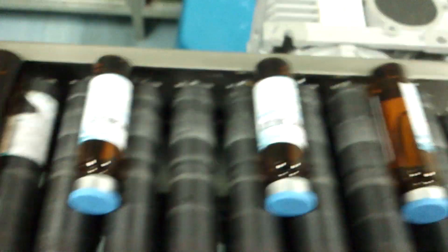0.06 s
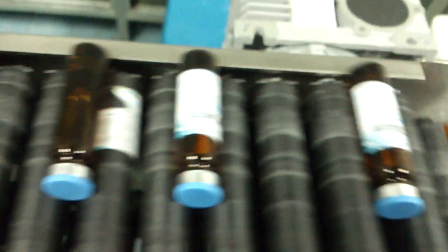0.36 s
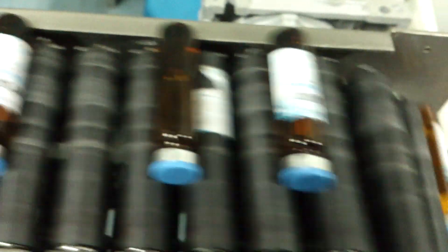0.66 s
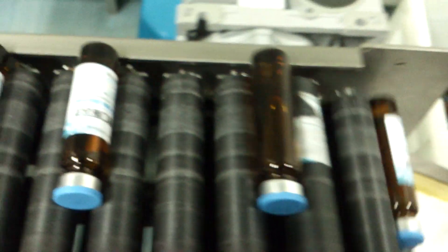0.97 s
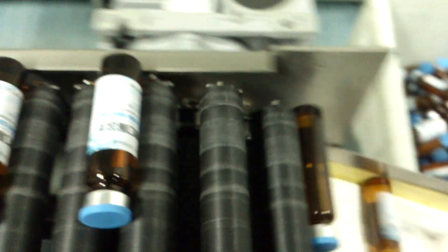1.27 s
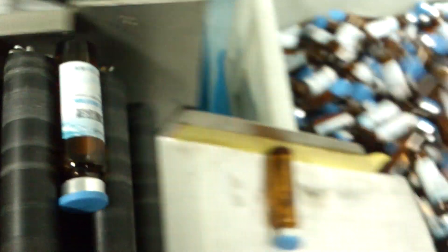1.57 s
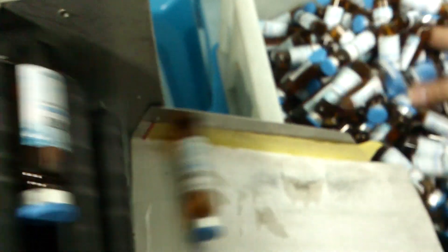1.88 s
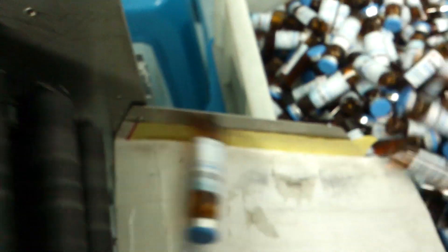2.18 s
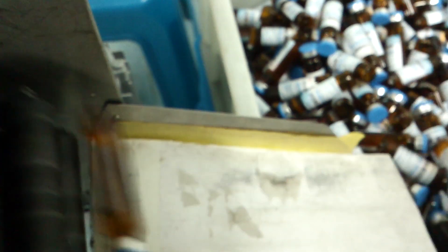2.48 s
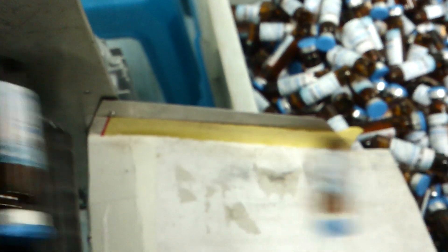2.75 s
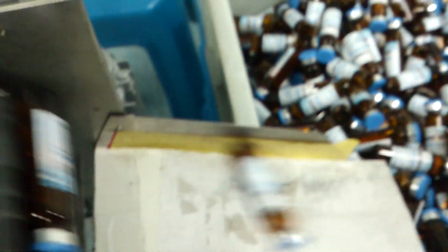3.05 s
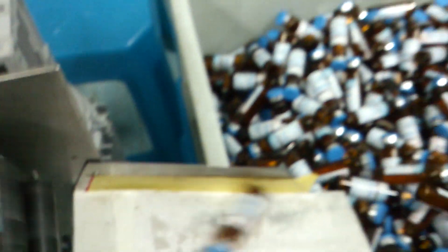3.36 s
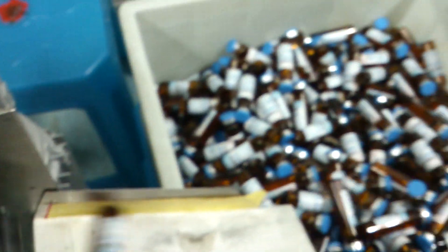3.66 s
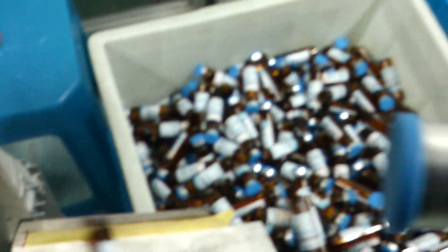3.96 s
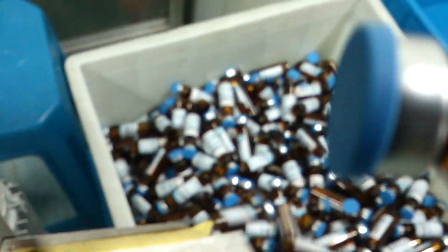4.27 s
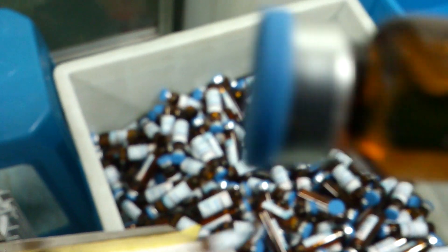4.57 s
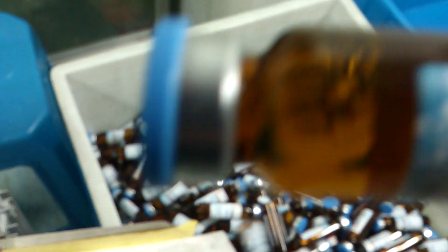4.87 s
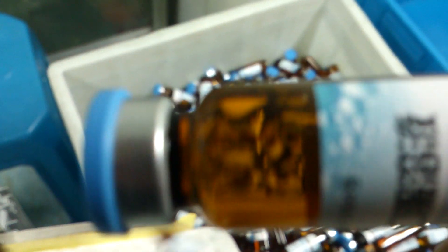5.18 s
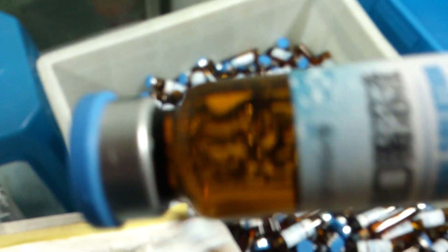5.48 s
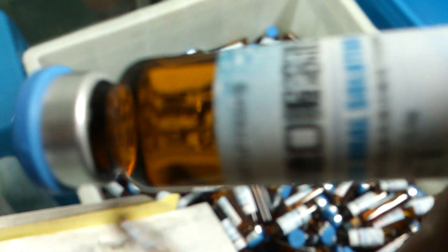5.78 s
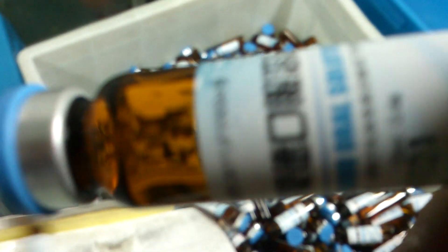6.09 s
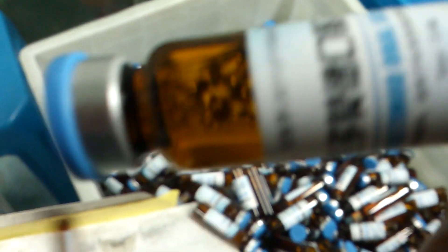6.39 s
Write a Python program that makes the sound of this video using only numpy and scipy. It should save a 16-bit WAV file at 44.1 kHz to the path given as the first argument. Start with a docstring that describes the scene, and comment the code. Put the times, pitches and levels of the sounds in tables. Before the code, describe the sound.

Little glass bottles rattle and collide on the rollers of a labeling machine, heard up close. Two rushes of air fill the first second; then come the busiest clinks, a brief roll down a chute and softer patters onto a pile of glass. Uneven knocks, faint whining drives and a swelling factory wash continue throughout. Toward the end the glass is quieter and a hand bumps the microphone softly.

```python
"""A factory hall, close by the roller conveyor of a labeling machine, one hand-held microphone.
Small glass vials chatter on the rumbling rollers, clink together, tumble down a chute and patter
into a crate. The mechanism knocks on its frame; in the first second a loud hiss of air surges twice.
Behind it all are the whine of the drives and the swelling wash of the hall. The microphone moves
off over the crate, and near the end the hand shifts on it with a low rumble."""
import sys
import numpy as np
from scipy import signal
from scipy.fft import rfft, irfft
from scipy.io import wavfile
from scipy.ndimage import uniform_filter1d

SR = 44100
rng = np.random.default_rng(int(sys.argv[2]) if len(sys.argv) > 2 else 0)


def dump(signal):
    """Clip the signal to [-1, 1] and save it as 16-bit WAV at the path in sys.argv[1]."""
    limited = np.clip(np.atleast_2d(signal).T, -1, 1)
    pcm = np.round(limited * 32767).astype(np.int16)
    wavfile.write(sys.argv[1], SR, pcm)


N = 284004
TIME = np.arange(N) / SR

# modes of a glass vial: nominal f/Hz, relative level/dB, t60/s
GLASS_MODES = [(6173, 0.5, 0.028), (6760, -8, 0.022), (12367, 1.5, 0.014), (12460, 2, 0.023),
               (15900, -6, .012)]
# spectrum of hissing air: f/Hz, relative level/dB
HISS_SPECTRUM = [(300, -67), (1800, -15.5), (2750, -4), (3300, -3), (3750, 1.5), (4900, -8.5), (6000, -15),
                 (7500, -16.5), (9500, -20.5), (11700, -16.5), (13100, -6.5), (14300, -15), (16000, -22)]


def chatter(per_s, scatter_db, level_db, bunch_db, count=8, size=3000):
    """Close up, slightly different vials tap in random bunches as the rollers turn them."""
    out = 0
    for _ in range(count):
        gaps, force = rng.exponential(size=(size, 2)).T
        at = (np.cumsum(gaps) * SR * count / per_s).astype(int)
        push = undb(scatter_db * np.minimum(force, 2.5)) * rng.choice([-1, 1], size)
        taps = np.bincount(at[at < N], push[at < N], N)
        body = vial(1 + 0.0011 * rng.standard_normal(), clack_db=-3.0, crack_db=-11.5, spread=.016)
        out = out + signal.oaconvolve(taps, body)[:N]
    bunched = unit(out * undb(bunch_db * wander(55)))
    return bunched * activity(bed_db=-35.5, near_power=1.4, column=2) * undb(level_db)


def clinks(level_db, clack_db, rebound_s, weight):
    """The harder collisions of glass on glass; no two vials ring quite alike."""
    # collisions: t/s, relative peak level/dB, clack against the ring/dB
    collisions = [(0.021, -17.5, -3), (0.063, -17, 1), (0.9116, -3, 0.5), (0.9927, -13, -13),
                  (1.0026, -6.5, -1.5), (1.0453, -12, 2), (1.06, -6.5, -15), (1.071, -15, -18),
                  (1.0904, -10, -21), (1.17, -9, -12), (1.2106, -12, -1.5), (1.3818, -12.5, -9),
                  (1.5474, -17, -18), (1.578, -18.5, -7), (1.8057, -9.5, -1), (1.9016, -13, -4.5),
                  (2.1103, -11, 2), (2.2426, -17, -11), (2.2563, -7, -4), (2.3908, -11, -4),
                  (2.4875, -11.5, -6), (2.5316, -17, -11), (2.7851, -16, -9), (2.8301, -14.5, -7),
                  (2.9731, -12, -17), (3.001, -11.5, -7.5), (3.3252, -10, -3.5), (3.3577, -16.5, -9),
                  (3.6177, -22, -2), (4.0295, -18.5, -11), (4.2652, -18, -12), (4.6557, -21, -18),
                  (4.915, -16.5, -6), (6.356, -16, -3)]
    out = np.zeros(N)
    for s, db, low_db in collisions:
        body = vial(1 + 0.0032 * rng.standard_normal(), low_db + clack_db, crack_db=-8.5, spread=0.043)
        # a light, bright touch is over sooner than a heavy clack
        push = contact(rebound_s * undb(weight * low_db), scatter=0.92)
        add(out, s, signal.fftconvolve(body, push), db + level_db)
    return out


def vial(tune, clack_db, crack_db, spread):
    """One vial's answer to a tap: glass ring, lower clack and a broadband crack."""
    # vial against its cap and the roller: nominal f/Hz, relative level/dB, t60/s
    clack_modes = [(3380, -20, 0.013), (3773, 14, 0.013), (4405, 9, 0.032)]
    sound = ring(GLASS_MODES, tune, spread, count=5)
    sound += undb(clack_db) * ring(clack_modes, tune, spread=0.0944, count=10)
    sound[0] += undb(crack_db)
    return sound


def crate(level_db, upper_db):
    """Vials patter on the pile; softer contact rings mostly the lowest glass mode."""
    # vials settling: t/s, relative peak level/dB, patter t60/s
    landings = [(.02, -30.5, 0.41), (3.21, -35, 0.22), (4.58, -36, .3), (4.759, -34, 0.45),
                (4.84, -34, 0.19), (4.919, -30.5, 0.37), (5.12, -36, .3), (5.519, -28, 0.11),
                (5.575, -19, 0.023), (5.66, -41, 0.21), (6.04, -41, 0.21), (6.391, -35, 0.37)]
    out = np.zeros(N)
    for s, db, patter_s in landings:
        body = ring(GLASS_MODES[:1], 0.99, spread=0.023, count=8)
        body += undb(upper_db) * ring(GLASS_MODES[1:], 0.99, spread=0.018)
        add(out, s, signal.fftconvolve(body, contact(patter_s, scatter=8.8)), db + level_db)
    return out


def air(hiss_db, roar_db, lead_s, spit_db, spit_s):
    """A rush of air surges twice, with more roar the second time."""
    # course of the rush: t/s, relative hiss level/dB, relative roar level/dB
    surges = [(.2, -41, -37), (0.251, -15, -26.5), (.31, -14, -27), (.36, -16, -29.5), (.49, -23, -35),
              (.55, -17, -26.5), (.68, -18.5, -25.5), (.76, -14.5, -22), (.82, -17, -24), (.88, -20, -28.5),
              (1.0, -21.5, -31)]
    # roar under the hiss: f/Hz, relative level/dB
    roar_spectrum = [(30, -37), (85, -21), (170, -12), (270, -11), (410, 4.5), (540, -1.5), (1000, -4),
                     (1400, -0.5), (2000, 0), (3500, -29)]
    start, end = surges[0][0], surges[-1][0]
    valve = np.clip((TIME - start) / 0.018, 0, 1) * np.clip((end - TIME) / 0.049, 0, 1)
    jet = noise(HISS_SPECTRUM, ripple_db=2.5) * undb(hiss_db + 0.66 * wander(60.8))
    treble = signal.sosfiltfilt(signal.butter(2, 5500, "high", fs=SR, output="sos"), jet)
    flow = follow(surges)
    # the treble spits as the valve opens and runs ahead of each surge
    spit = undb(spit_db * np.exp(-np.maximum(TIME - start, 0) / spit_s))
    hiss = (jet - treble) * flow + treble * spit * np.interp(TIME + lead_s, TIME, flow)
    roar = noise(roar_spectrum, ripple_db=3.5) * follow(surges, column=2) * undb(roar_db)
    return valve * (hiss + roar)


def knocks(level_db, crack_db, soft_hz):
    """Dry blows on the machine frame, whose modes lie densely; blunt contact leaves little treble."""
    # the mechanism's limping pairs of blows: t/s, relative peak level/dB
    blows = [(0.154, -22), (1.227, -18.5), (1.491, -21), (1.725, -15.5), (1.832, -16.5), (1.851, -15),
             (2.161, -18.5), (2.39, -17.5), (2.569, -17.5), (2.959, -20.5), (3.231, -17.5), (3.654, -19),
             (3.916, -16), (4.31, -21.5), (4.588, -21), (4.983, -18.5), (5.262, -18), (5.65, -24),
             (6.072, -19.5), (6.317, -26)]
    # machine frame: nominal f/Hz, relative level/dB, t60/s
    frame_modes = [(820, -16, 0.0034), (1280, 1, 0.011), (1690, 3, 0.016), (2290, -2.5, 0.022),
                   (3460, 7, 0.0036)]
    out = np.zeros(N)
    for s, db in blows:
        body = ring(frame_modes, 0.97, spread=0.192, count=20)
        body[0] += undb(crack_db)
        add(out, s, signal.fftconvolve(body, contact(t60=0.048, scatter=1.0)), db + level_db)
    return filtered(out, 1, soft_hz, "low")


def rollers():
    """The rollers rumble unevenly, answering each tumble late and dying away slowly."""
    # roller rumble: f/Hz, relative level/dB
    spectrum = [(30, -32), (90, -20.5), (150, -8.5), (215, -1.5), (280, 2.5), (350, -7.5), (500, -7.5),
                (1200, -36.5)]
    load = activity(bed_db=-42.5, near_power=0.85, column=4, lag_s=0.025, release_s=0.094)
    return noise(spectrum, ripple_db=-0.5) * load * undb(1.7 * wander(35))


def chute(level_db, pass_s, width_s):
    """Vials roll down the chute, loudest as the microphone passes over it."""
    # rolling on the chute: f/Hz, relative level/dB
    spectrum = [(70, -23), (200, 0), (450, 3.5), (750, 11), (1050, -7), (1700, -6), (3500, -16)]
    passing = np.maximum(1 / np.hypot(1, (TIME - pass_s) / width_s), undb(-26))
    return noise(spectrum, ripple_db=3) * passing * undb(level_db + 3.8 * np.tanh(wander(45)))


def drives(level_db):
    """The drives whine in faint, slightly wavering tones."""
    # drive tones: f/Hz, relative level/dB
    tones = [(283, -57.5), (1307, -69), (1401, -57), (1688, -55), (2755, -78)]
    whine = 0
    for hz, db in tones:
        pitch = hz * (1 + 0.00271 * wander(25))
        whine = whine + undb(db) * np.sin(2 * np.pi * np.cumsum(pitch) / SR)
    return np.sqrt(2) * undb(level_db) * whine


def buffet():
    """The second surge of air buffets the microphone."""
    # gust: t/s, level/dB
    gust = [(.45, -80), (.55, -46), (.75, -53), (.9, -83)]
    return rumble(gust, band_hz=[75, 135])


def handling():
    """The hand shifts on the microphone body with a deep rumble."""
    # handling noise: t/s, level/dB
    grip = [(5.55, -81), (5.68, -45), (5.78, -60.5), (5.98, -56), (6.15, -90)]
    return rumble(grip, band_hz=[35, 70])


def hall(swell_db, steady_db, sizzle_db, sizzle_growth):
    """Machinery farther off: a steady bed, and a wash that swells and hisses as each vial slides."""
    # wash of the hall: f/Hz, relative level/dB
    spectrum = [(25, -17), (90, -14), (160, -10), (280, -13), (600, -9.5), (1000, -8.5), (1500, -6),
                (2400, -4.5), (3700, 2.5), (4400, -3), (5400, -11.5), (6300, -10.5), (8000, -28),
                (15500, -36)]
    swell = activity(bed_db=-29.5, near_power=0.43, column=3)
    wash = noise(spectrum, ripple_db=1.5) * swell * undb(swell_db + 1.68 * wander(40))
    wash = filtered(wash, 1, 700, "high")
    sizzle = noise(HISS_SPECTRUM, ripple_db=2.5) * (swell / swell.max()) ** sizzle_growth
    return wash + undb(sizzle_db) * sizzle + undb(steady_db) * noise(spectrum, ripple_db=4.0)


def room(x, t60, wet_db, size=22050):
    """Direct sound plus diffuse reflections from the machine's panels and the hall."""
    tail = rng.standard_normal(size) * undb(-60 * np.arange(size) / SR / t60)
    return x + undb(wet_db) * signal.fftconvolve(x, tail / np.linalg.norm(tail))[:N]


def activity(bed_db, near_power, column, lag_s=0, attack_s=0.036, release_s=0.036):
    """Gain over time: a bed that grows with nearness, plus a rise, hold and fall for every tumble."""
    # microphone's nearness to the conveyor, then off over the crate: t/s, relative level/dB
    nearness = [(0, -8), (.45, -9), (1.05, 1.5), (1.28, -4.5), (1.8, 0.5), (2.35, -1.5), (2.7, -3.5),
                (3.1, -12), (4.5, -8.5), (6.44, -13)]
    # vials tumble off the rollers and slide: t/s, length/s, relative chatter/dB, scrape/dB, rumble/dB
    tumbles = [(0.01, 0.059, -40, -27.5, -61), (0.138, 0.055, -35.5, -25, -59),
               (0.98, 0.12, -27, -30, -39.5), (1.152, 0.057, -27.5, -30.5, -40),
               (1.549, 0.19, -27.5, -30.5, -38), (2.025, 0.32, -32, -36, -43), (2.774, .18, -38, -35, -43),
               (3.194, 0.035, -40.5, -32, -47), (3.327, 0.067, -41, -36, -46),
               (3.455, 0.032, -37, -23.5, -53), (3.574, 0.091, -46, -42, -44.5),
               (3.714, 0.036, -44, -34.5, -50.5), (3.976, 0.075, -34.5, -32.5, -42),
               (4.197, 0.04, -44, -32, -42.5), (4.36, 0.054, -62, -43, -48), (4.61, .07, -44, -37.5, -46),
               (4.765, 0.016, -38.5, -29, -62), (4.878, 0.056, -36, -28, -46.5),
               (5.14, 0.063, -47, -32.5, -58), (5.28, 0.057, -57, -44, -48.5),
               (5.485, 0.084, -42, -28, -53), (5.643, 0.07, -40.5, -28.5, -44),
               (5.886, 0.037, -44, -27.5, -46), (6.03, 0.13, -49, -35.5, -49.5),
               (6.216, 0.021, -46, -32.5, -55), (6.412, .04, -47, -30.5, -45)]
    power = (undb(bed_db) * follow(nearness) ** near_power) ** 2
    for row in tumbles:
        age = TIME - row[0] - lag_s
        fade = np.maximum(-age, 0) / attack_s + np.maximum(age - row[1], 0) / release_s
        power = power + (undb(row[column]) * np.exp(-fade)) ** 2
    return np.sqrt(power)


def ring(modes, tune, spread, count=4, size=1024):
    """Ring of a struck thing with unit energy; each mode is a cluster of close partials."""
    t = np.arange(size) / SR
    out = 0
    for hz, db, t60 in modes:
        partials = tune * hz * (1 + spread * rng.standard_normal((count, 1)))
        waves = rng.choice([-1, 1], (count, 1)) * np.sin(2 * np.pi * partials * t)
        out = out + undb(db) * unit(waves.sum(0) * undb(-60 * t / t60))
    return out / np.linalg.norm(out)


def contact(t60, scatter, size=8192):
    """A sharp tap followed by a dying chatter of tiny rebounds."""
    push = rng.standard_normal(size) ** 3 * undb(-60 * np.arange(size) / SR / t60)
    push *= scatter / np.linalg.norm(push)
    push[0] += 1
    return push


def noise(spectrum, ripple_db):
    """Noise of a given spectrum; reflections comb it into narrow, steady peaks."""
    hz, db = np.transpose(spectrum)
    f = np.arange(N // 2 + 1) * SR / N
    grid_hz = np.arange(0, SR, 30)
    comb = np.interp(f, grid_hz, rng.standard_normal(len(grid_hz)))
    gain = undb(np.interp(np.log(f + 1), np.log(hz), db) + ripple_db * comb)
    return unit(irfft(rfft(rng.standard_normal(N)) * gain, N))


def rumble(curve, band_hz):
    """A band of noise that follows a level curve."""
    return unit(filtered(rng.standard_normal(N), 2, band_hz, "band")) * follow(curve)


def wander(rate_hz):
    """Smooth random drift with a spread near 1."""
    hold = int(SR / rate_hz)
    steps = np.repeat(rng.standard_normal(N // hold + 1), hold)
    return 1.456 * uniform_filter1d(uniform_filter1d(steps, hold), hold)[:N]


def follow(curve, column=1):
    """Gain over time from one dB column of a curve."""
    rows = np.vstack(curve)
    return undb(np.interp(TIME, rows[:, 0], rows[:, column]))


def add(out, s, sound, db):
    """Mix in a sound at a time and a peak level."""
    i = max(int(s * SR), 0)
    out[i:i + len(sound)] += (sound * undb(db) / np.abs(sound).max())[:N - i]


def filtered(x, order, hz, kind):
    """Low-, high- or band-pass filter."""
    return signal.sosfilt(signal.butter(order, hz, kind, fs=SR, output="sos"), x)


def undb(db):
    """Decibels to gain."""
    return 10 ** (np.asarray(db) / 20)


def unit(x):
    """Scale to rms 1."""
    return x / np.sqrt(np.mean(x ** 2))


def scene():
    """All sources at one microphone, the same in both channels."""
    near = chatter(per_s=1150, scatter_db=8, level_db=3.5, bunch_db=2.5)
    near += clinks(level_db=3.5, clack_db=2.0, rebound_s=0.025, weight=0.34)
    near += crate(level_db=7.5, upper_db=-19)
    near += knocks(level_db=5.5, crack_db=-10.5, soft_hz=6000)
    near = filtered(near, 2, 320, "high")  # small parts radiate no bass
    mono = room(near, t60=0.12, wet_db=-9.5)
    mono += rollers() + chute(level_db=-34, pass_s=1.88, width_s=0.13) + drives(level_db=-3.5)
    mono += air(hiss_db=0, roar_db=-0.5, lead_s=0.015, spit_db=10, spit_s=0.072) + buffet()
    mono += hall(swell_db=-0.8, steady_db=-38.5, sizzle_db=-27, sizzle_growth=1.84)
    mono += handling()
    return np.array([mono, mono])


def record(dry):
    """The recorder clips at full scale and cuts the top above 15750 Hz."""
    top_cut = signal.ellip(10, .2, 70, 15750, fs=SR, output="sos")
    return signal.sosfilt(top_cut, np.clip(dry, -1, 1))


dry = scene()
out = record(dry)
dump(out)
```